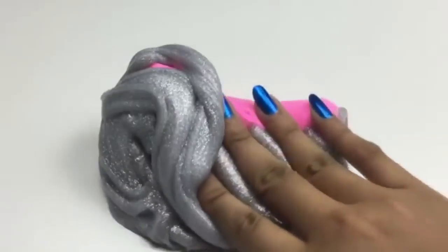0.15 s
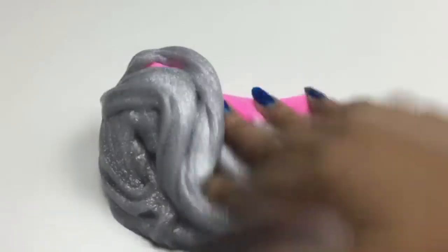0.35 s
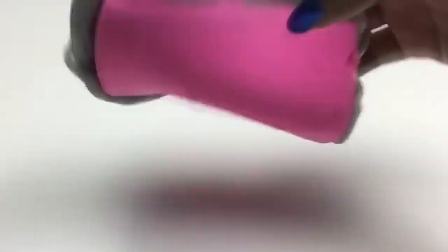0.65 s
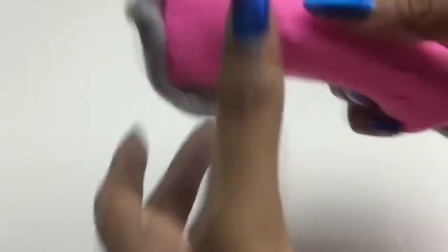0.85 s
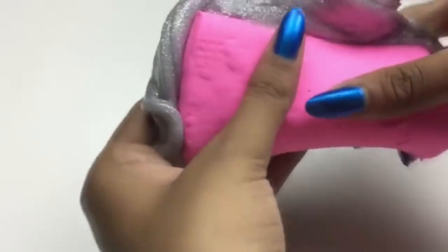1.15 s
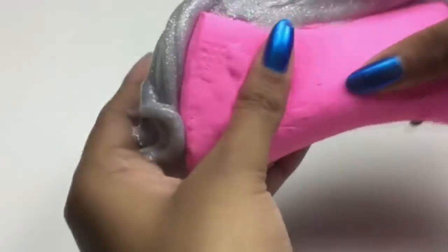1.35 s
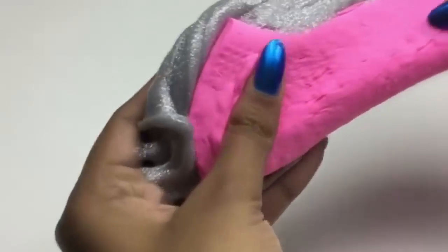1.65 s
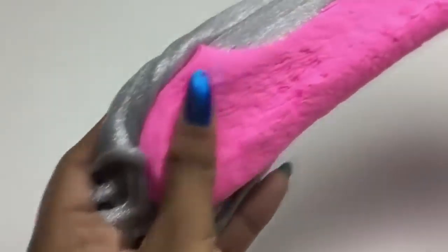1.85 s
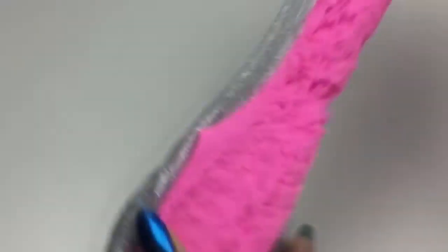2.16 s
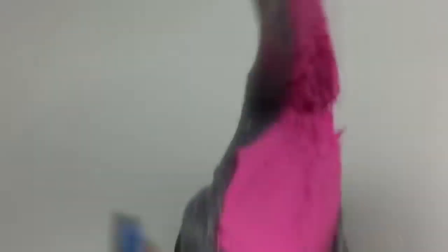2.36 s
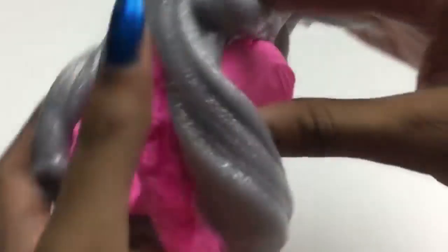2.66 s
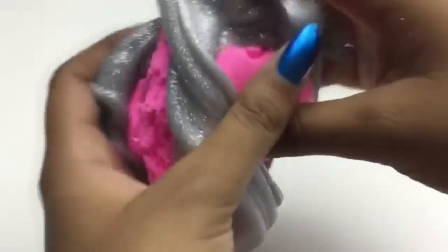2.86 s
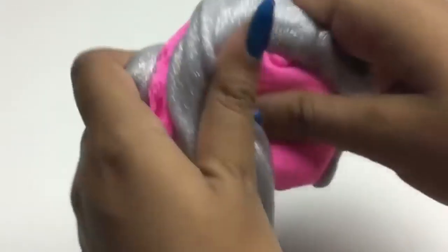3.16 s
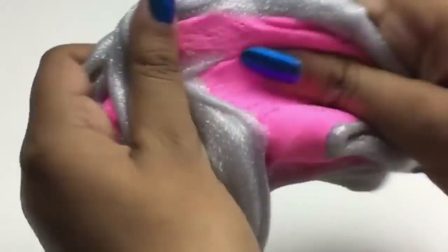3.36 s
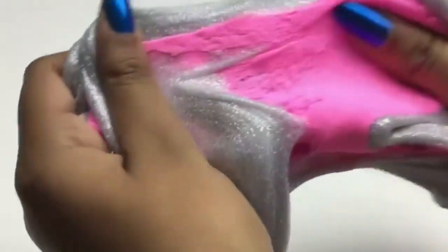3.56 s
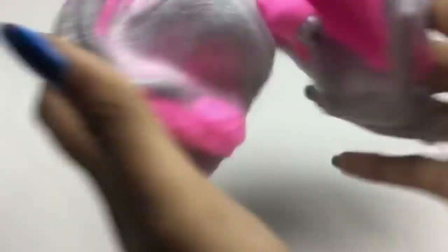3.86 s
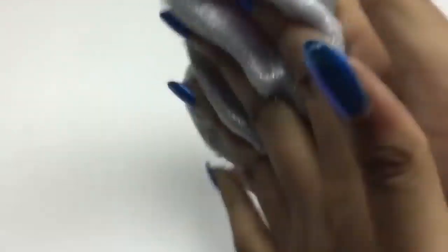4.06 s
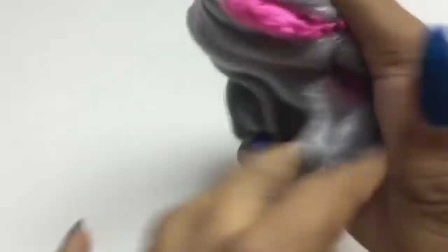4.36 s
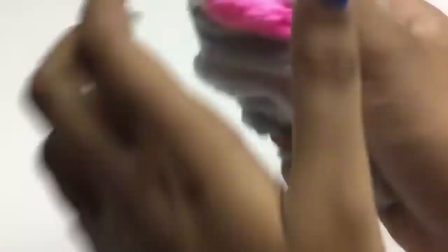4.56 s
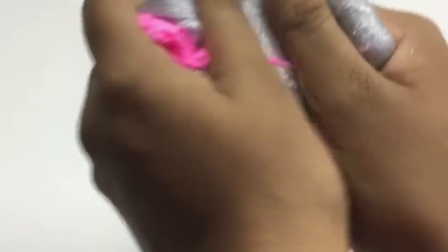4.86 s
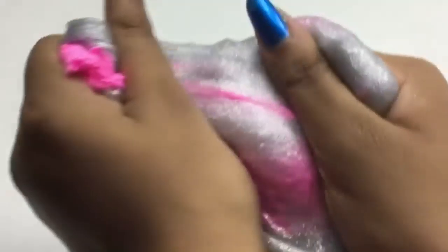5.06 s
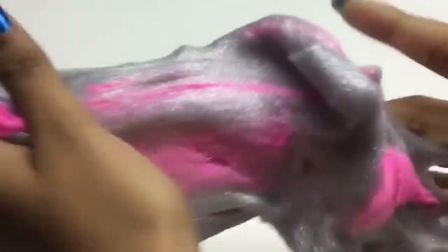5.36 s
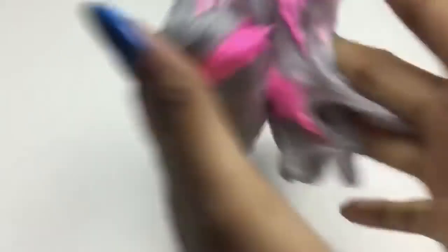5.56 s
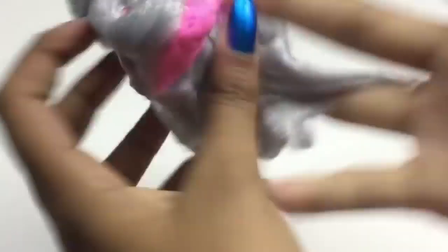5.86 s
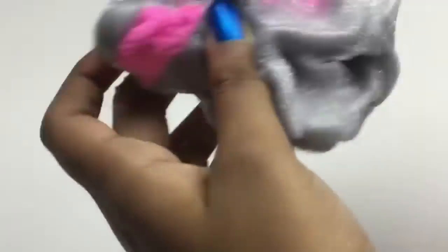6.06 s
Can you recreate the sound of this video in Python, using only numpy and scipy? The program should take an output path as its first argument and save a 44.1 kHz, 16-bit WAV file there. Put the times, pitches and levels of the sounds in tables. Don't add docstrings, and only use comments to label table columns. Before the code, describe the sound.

Sticky film peels off skin in fine wet crackles, mostly sparse at first apart from one early squeeze. Around the middle, a cluster of snaps leads to heavier squelches and short airy wheezes. The last stretch is busiest, with a bright burst, thick kneading and one very sharp crack before easing. Close, dry sound in a small room with distant low hum.

```python
import sys
import numpy as np
from scipy import signal
from scipy.fft import rfft, irfft, next_fast_len
from scipy.io import wavfile
from scipy.ndimage import uniform_filter1d, map_coordinates

SR = 44100
rng = np.random.default_rng(int(sys.argv[2]) if len(sys.argv) > 2 else 0)


def magnitude_from_level(level_db):
    exponent = np.asarray(level_db, float) / 20
    return 10 ** exponent


def unload_wav(signal):
    wavfile.write(
        sys.argv[1],
        SR,
        np.round(np.clip(np.atleast_2d(signal).T, -1, 1) * 32767).astype(np.int16),
    )


N = 274302
SLOPE_DB = 20


def unit(x):
    return x / np.sqrt(np.mean(x ** 2) + 1e-20)


def along(points, hz):
    f, v = np.transpose(points)
    return np.interp(np.log(hz + 1), np.log(f + 1), v)


def curves(rows):
    s, *cols = np.transpose(rows)
    return [np.interp(np.arange(N) / SR, s, c) for c in cols]


def wobble(rate):
    knots = rng.standard_normal(int(N * 200 / SR) + 4)
    return map_coordinates(knots, [np.arange(N) * min(rate, 200) / SR])


def filtered(x, response):
    m = next_fast_len(N + SR // 2)
    spectrum = rfft(x, m) * response(np.fft.rfftfreq(m, 1 / SR))
    return irfft(spectrum, m)[..., :N]


def bursts(peak_s, hz, cycles, gain, size):
    turns = hz[:, None] * np.arange(size) / SR
    swell = turns / cycles * np.exp(1 - turns / cycles)
    rings = gain[:, None] * np.sin(2 * np.pi * turns) * swell
    rings = rings * np.hanning(2 * size)[size:]
    start_s = np.maximum(peak_s[:, None] - cycles / hz[:, None], 0)
    at = np.round(start_s * SR).astype(int) + np.arange(size)
    return np.bincount(at.ravel(), rings.ravel(), N + SR)[:N]


def tearing():
    big_gain, middle_gain, fine_gain = squeeze()
    clumps = magnitude_from_level(1.1 * wobble(45) + 1.5 * wobble(140))
    big = swarm(286, 1290, cycles=1.07, spread_db=2.5, wash=0.42, clumps=clumps, count=3000, size=500)
    middle = swarm(1160, 3910, cycles=1.4, spread_db=2.0, wash=0.7, clumps=clumps, count=8000, size=200)
    fine = swarm(4000, 15000, cycles=1.1, spread_db=3.2, wash=0.5, clumps=clumps, count=20000, size=80)
    return magnitude_from_level(-1.86) * big_gain * big + magnitude_from_level(-0.42) * middle_gain * middle + magnitude_from_level(-2.0) * fine_gain * fine


def squeeze():
    # start_s, pull_db, film_thinness_db
    pull = [(0, -73.5, -8), (.445, -77.5, -4), (.64, -68.5, -5), (.786, -73, -5), (.87, -69, 1),
            (1.1, -65, -7), (1.36, -67.5, 0), (1.5, -76, -2.5), (2.1, -74.5, 4.5), (2.5, -73, 5.5),
            (3.02, -73, 1), (3.49, -68, 9.5), (3.505, -58.5, 3), (3.83, -58.5, 1), (4.17, -64, -3.5),
            (4.6, -70, -1.5), (5.3, -60.5, 2), (5.77, -60.5, -2)]
    # peak_s, rise_s, fall_s, level_db, big_pockets_over_rest_db
    knead_strokes = [(0.536, 0.033, .075, -41.5, -1), (.58, 0.017, 0.056, -50.5, 0.5),
                     (1.227, 0.082, 0.049, -59.5, 1.5), (1.322, 0.04, 0.008, -59, -14),
                     (2.235, 0.072, 0.16, -65.5, -1.5), (2.427, 0.043, 0.028, -55.5, -3.5),
                     (2.801, 0.045, 0.079, -53.5, -9), (3.397, 0.1, 0.084, -52, -4.5),
                     (3.53, 0.034, 0.23, -67, 7), (3.949, 0.062, 0.09, -39, -7.5),
                     (4.085, 0.26, 0.059, -52.5, -7.5), (4.426, 0.094, 0.06, -44, -6.5),
                     (4.483, 0.037, 0.037, -44, -1), (5.386, 0.051, 0.1, -38, -5),
                     (5.465, 0.075, 0.07, -46, -2), (5.524, 0.014, 0.086, -42, -14),
                     (5.582, 0.063, 0.04, -44, -1), (5.652, .012, 0.057, -50, -6),
                     (5.685, 0.064, 0.047, -45, -5), (5.72, 0.029, 0.02, -48.5, -3),
                     (6.016, 0.064, 0.082, -50.5, -2.5), (6.068, 0.042, 0.052, -49.5, -12),
                     (6.16, 0.031, 0.033, -48.5, -11), (6.184, .021, 0.065, -58, 7.5)]
    # peak_s, rise_s, fall_s, level_db, middle_pockets_over_film_db
    peel_strokes = [(.705, .011, .04, -60.5, -3.5), (.99, 0.18, .25, -63.5, 1.5),
                    (1.255, .011, .04, -55, -3), (1.29, .06, .11, -64, -11), (2.71, 0.11, .15, -59, -2),
                    (2.2, .011, .3, -67.5, -8), (3.319, 0.002, 0.024, -39.5, -5),
                    (3.88, 0.077, 0.19, -47, -6), (3.939, .007, 0.046, -36.5, -3.5),
                    (4.135, 0.14, 0.02, -56.5, -3), (4.28, 0.19, 0.13, -58.5, -10),
                    (4.322, .006, 0.14, -52, -10), (4.345, 0.063, 0.16, -45, -4.5),
                    (4.538, 0.1, 0.016, -50, -2), (5.0, 0.077, 0.082, -48.5, -8.5),
                    (5.116, 0.002, 0.02, -35, -11), (5.14, 0.033, 0.087, -55, -21),
                    (5.255, .009, 0.054, -47.5, 0), (5.356, 0.047, 0.12, -39.5, -9),
                    (5.62, .11, .11, -53, -0.5), (5.811, .008, .15, -58, 0.5),
                    (5.919, 0.091, 0.26, -53.5, -1.5), (5.065, .006, .04, -56, -12)]
    pull_db, thin_db = curves(pull)
    knead_db, big_db = np.transpose(knead_strokes)[3:]
    peel_db, middle_db = np.transpose(peel_strokes)[3:]
    big_rest_db = -63.5 + 0.68 * (pull_db + 60.5)
    film_db, peel_big_db = 0.6, -10.5
    steady = [big_rest_db, pull_db, pull_db + thin_db]
    kneads = [knead_db + big_db, knead_db, knead_db + film_db]
    peels = [peel_db + middle_db + peel_big_db, peel_db + middle_db, peel_db]
    gains = []
    for rest, knead, peel in zip(steady, kneads, peels):
        power = strokes(knead_strokes, knead, roundness=1.63) + strokes(peel_strokes, peel, roundness=1.03)
        gains.append(np.sqrt(magnitude_from_level(rest) ** 2 + power))
    return gains


def strokes(rows, level_db, roundness):
    s, rise_s, fall_s = np.transpose(rows)[:3, :, None]
    t = np.arange(0, N, 32) / SR
    away = np.where(t < s, (s - t) / rise_s, (t - s) / fall_s)
    power = magnitude_from_level(level_db[:, None] - SLOPE_DB * away ** roundness) ** 2
    return np.interp(np.arange(N) / SR, t, power.sum(0))


def swarm(lo_hz, hi_hz, cycles, spread_db, wash, clumps, count, size):
    # frequency_hz, density_db_per_hz
    tear_colour = [(120, -47), (200, 1.5), (322, -2.5), (466, -7.5), (819, -6.0), (1070, -9.0),
                   (2010, -8.5), (2910, -10.5), (6440, -2.5), (13500, -6.5), (17000, -8)]

    def band(f):
        edges = np.sqrt((1 + (lo_hz / (f + 1)) ** 8) * (1 + (f / hi_hz) ** 8))
        return magnitude_from_level(along(tear_colour, f)) / edges

    when, pitch, chance, sign = rng.random((count, 4)).T
    gain = magnitude_from_level(-spread_db * np.log(chance + 8e-3)) * np.sign(sign - 0.5)
    grains = unit(bursts(when * N / SR, lo_hz * (hi_hz / lo_hz) ** pitch, cycles, gain, size))
    coloured = unit(filtered(grains, lambda f: band(f) * np.sqrt(f / hi_hz)))
    finer = unit(filtered(rng.standard_normal(N), band))
    wash = np.clip(wash, 0, 1)
    return unit((np.sqrt(1 - wash) * coloured + np.sqrt(wash) * finer) * clumps)


def hollow(x):
    # start_s, centre_hz, lift_db
    hollow_path = [(.5, 310, 0), (.58, 330, 7), (.63, 1800, 1), (1.2, 1420, 0.5), (2.23, 2220, 4),
                   (2.43, 1270, 4), (2.8, 1410, 1.5), (3.52, 352, 7), (3.8, 420, 3.5), (3.9, 2750, -1.5),
                   (4.02, 2000, 5), (4.13, 1440, 4), (4.45, 2280, 1), (5.3, 2210, -3), (5.37, 800, 4.5),
                   (5.48, 825, 1.5), (5.53, 3460, -0.5), (5.72, 1600, -2)]
    hz, t, z = signal.stft(x, SR, nperseg=512)
    s, centre_hz, lift_db = np.transpose(hollow_path)
    octaves = np.log2((hz[:, None] + 1) / np.interp(t, s, centre_hz))
    lift = np.interp(t, s, lift_db) * (np.exp(-(octaves / 0.4) ** 2) - 0.25)
    patches = uniform_filter1d(rng.standard_normal(z.shape), size=7, axis=0)
    patches = uniform_filter1d(patches, size=6, axis=1)
    return signal.istft(z * magnitude_from_level(lift + 1.53 * unit(patches)), SR, nperseg=512)[1][:N]


def pops():
    # peak_s, snap_db, snap_hz, cavity_db, cavity_hz
    large_pops = np.array([(0.5254, -29, 5530, -29, 2310), (0.5343, -22, 7000, -35, 587),
                           (0.987, -33, 8450, -46, 1850), (1.227, -36, 3020, -29.5, 1460),
                           (2.2366, -35.5, 8300, -39, 1710), (2.4236, -31, 7570, -37.5, 1670),
                           (2.7317, -37, 8460, -42, 2110), (3.0164, -33, 8200, -36, 1940),
                           (3.0542, -27.5, 5840, -38, 2270), (3.3185, -24, 5940, -35.5, 1190),
                           (3.394, -27, 4320, -38.5, 1220), (3.501, -23, 5830, -26.5, 2490),
                           (3.9384, -18, 5700, -27, 3000), (3.9627, -30, 5490, -27, 2170),
                           (4.44, -32, 3070, -40, 2370), (5.0035, -28.5, 3850, -31, 1980),
                           (5.1154, -26, 5370, -27, 740), (5.2531, -23.5, 2870, -17, 1880),
                           (5.3535, -21, 5800, -40, 1940), (5.5208, -24.5, 4580, -35.5, 970),
                           (5.8051, -24, 8500, -30, 2200), (5.9133, -37, 7550, -36, 2190),
                           (6.0638, -40, 5700, -35, 2520), (6.1552, -30, 5700, -42, 850)])
    # peak_s, level_db, pitch_hz
    ticks = [(.8352, -48, 8600), (0.846, -51, 3410), (1.7298, -42, 6180), (1.9311, -46, 6830),
             (2.003, -40.5, 8750), (2.0953, -49, 6140), (2.9964, -50, 3620), (3.1818, -45, 7000),
             (3.1987, -45, 8420), (3.3635, -30, 8760), (3.371, -36, 9100), (3.4059, -36, 3470),
             (3.4188, -39, 3730), (3.523, -40, 4720), (3.6354, -35, 6160), (3.6447, -42.7, 5860),
             (2.733, -43, 3300), (4.2353, -41, 8940), (4.8465, -42, 4600), (4.9679, -42, 6880),
             (5.0298, -32, 8090), (5.0451, -42, 4120), (5.0726, -39, 5500), (5.0906, -39, 7000),
             (5.2211, -43, 6570), (5.509, -32, 6000), (5.577, -25, 3380), (6.2114, -38, 3540)]
    # peak_s, level_db
    cracks = [(.5342, -30), (.9873, -38), (1.6578, -47), (1.7295, -33), (1.9311, -44), (2.0953, -49),
              (2.1995, -41), (2.2366, -37), (2.4235, -28), (2.803, -38), (3.0166, -41), (3.0541, -26),
              (3.3635, -32), (3.394, -30), (3.4188, -36), (3.4278, -30), (3.501, -22), (3.6354, -31),
              (3.9383, -32), (4.4399, -24), (4.5356, -34), (4.6829, -30.5), (4.847, -29.5), (5.1155, -39),
              (5.353, -25), (5.5771, -34), (5.8053, -10), (5.914, -33), (6.1554, -43), (6.2114, -30)]
    # peak_s, level_db, pitch_hz
    further_ticks = [
        (5.6495, -36, 5000),
        (4.9972, -40, 5500),
        (5.6905, -36, 5500),
    ]
    # peak_s, level_db, pitch_hz
    knocks = [(1.187, -36, 1500), (1.1885, -39.5, 700), (1.2128, -36.5, 1950), (1.324, -38.5, 2410),
              (1.8855, -46, 2190), (2.0097, -42.5, 2120), (3.1997, -48.5, 1340), (3.2761, -50, 1700),
              (3.4515, -42, 1900), (3.523, -42, 1730), (3.6033, -49, 2230), (4.5472, -48, 1900),
              (5.097, -42, 650), (6.1858, -29.5, 780)]
    # peak_s, pitch_hz, level_db
    further_tones = [(1.2272, 2400, -38.5), (3.0159, 4400, -47), (3.0166, 3300, -40), (3.4, 5000, -49),
                     (5.1155, 7400, -12.5), (5.1155, 9100, -15.5), (5.1155, 11800, -32), (5.1164, 1180, -33.5),
                     (5.1156, 2450, -40), (5.8056, 3100, -34), (5.8057, 1950, -28), (5.8053, 15000, -25),
                     (5.1194, 3600, -29), (5.1156, 4180, -15), (5.1155, 5150, -10.5), (5.2533, 6700, -31),
                     (5.2533, 13000, -44), (5.8053, 7500, -18), (5.8053, 9300, -25), (.948, 12500, -52),
                     (1.188, 8500, -51)]

    crack_s, crack_db = np.transpose(cracks)
    crack_snaps = np.column_stack([crack_s, crack_db, np.full(len(crack_s), 0.0)])[:0]
    s, snap_db, snap_hz = np.vstack([large_pops[:, :3], ticks, crack_snaps, further_ticks]).T
    snap = bursts(s, snap_hz, 0.75, magnitude_from_level(snap_db), size=200)
    other_hz = np.where(snap_hz < 6500, 1.55, 1.3) * snap_hz
    second = bursts(s, other_hz, 1.2, magnitude_from_level(snap_db - 2.5), size=200)

    s, cavity_db, cavity_hz = np.vstack([large_pops[:, [0, 3, 4]], knocks]).T
    cavity = bursts(s + 0.0002, cavity_hz, 0.62, magnitude_from_level(cavity_db - 2.5), size=500)
    crack = bursts(crack_s, np.full(len(crack_s), 12300.0), 1.6, magnitude_from_level(crack_db - 6.5), size=100)
    s, twin_hz, twin_db = np.transpose(further_tones)
    twin = bursts(s, twin_hz, 1.545, magnitude_from_level(twin_db), size=200)
    return snap + second + cavity + crack + twin


def bubbles():
    # peak_s, pitch_hz, peak_db
    closed_pockets = [(.537, 330, -35), (.538, 1080, -37), (.551, 550, -39), (0.6168, 1850, -33.5),
                      (2.2293, 2350, -47), (2.733, 2050, -47.5), (2.801, 1540, -45), (2.802, 3960, -44),
                      (3.763, 2240, -45), (4.329, 2500, -44), (3.944, 5700, -33), (4.132, 1420, -45.5),
                      (4.39, 1900, -40), (4.419, 800, -39.5), (4.438, 2210, -39), (5.355, 5370, -36),
                      (5.355, 1980, -36.5), (5.377, 3170, -36), (5.387, 760, -37), (5.391, 2690, -38),
                      (5.403, 4300, -38), (5.428, 840, -36), (5.433, 2040, -33.5), (5.477, 840, -36),
                      (5.529, 3100, -39), (5.575, 3240, -36), (5.676, 3620, -39), (5.711, 1460, -46),
                      (6.027, 3640, -43), (6.065, 2500, -40), (6.066, 840, -41.5), (6.156, 5800, -34),
                      (6.128, 2250, -48), (5.591, 360, -38), (2.524, 3700, -53), (2.732, 2750, -47),
                      (4.428, 700, -42), (4.793, 2400, -51), (4.803, 2250, -51), (5.032, 800, -47)]
    s, hz, db = np.transpose(closed_pockets)
    return bursts(s, hz, 0.072 * np.sqrt(hz[:, None]), magnitude_from_level(db - 1.5), size=800)


def splutters():
    # peak_s, rise_s, fall_s, level_db, centre_hz
    emptying = [(3.0162, .006, 0.0065, -48, 5000), (3.0545, 0.0018, 0.0036, -46, 7000),
                (3.3235, .006, .012, -44, 6000), (3.3642, .001, .003, -45, 9500),
                (3.3685, .002, .002, -45, 11000), (3.371, .002, .003, -43, 10500),
                (3.386, .001, .003, -46, 9000), (3.397, .003, .004, -42, 4500),
                (3.406, .002, .003, -46, 5000), (3.4195, .004, 0.0083, -44.5, 8000),
                (5.1105, .001, .001, -47, 10000), (5.1133, .001, .002, -41, 9000),
                (5.12, .004, 0.032, -35.5, 6230), (5.2735, .0015, .0015, -45, 12000),
                (1.257, .006, .006, -52, 7500), (1.321, .012, .004, -54, 4500),
                (1.336, .002, .003, -56, 9500), (3.885, .012, .01, -41, 5460),
                (4.017, .002, .005, -47, 6000), (4.321, .002, .04, -45, 5000),
                (4.416, .004, .006, -45, 7000), (4.481, .008, .012, -42, 6500),
                (4.498, .006, .004, -49, 5500), (4.535, .004, .004, -47, 7000),
                (5.521, .003, 0.0042, -42, 5500), (5.53, .004, .005, -42, 4000),
                (5.553, .002, .002, -36, 7000), (5.592, .004, .004, -42, 8500),
                (6.064, .008, 0.012, -43, 5000), (6.163, .008, .014, -44, 5800),
                (5.913, .004, .003, -49, 3000), (6.2115, .002, .003, -46, 6000),
                (5.003, 0.0028, 0.0035, -46, 3000), (4.848, .003, .008, -53, 5000),
                (5.145, .03, 0.072, -47, 6200), (.545, .012, .03, -44, 5500), (5.39, .01, .02, -43, 8000),
                (5.428, .008, .01, -44, 9000), (4.983, .02, 0.017, -51.5, 3500),
                (5.0645, .002, .003, -52, 9000)]
    return escapes(emptying, octaves=0.91, size=4096)


def wheezes():
    # peak_s, rise_s, fall_s, level_db, centre_hz
    folds = [(.542, .015, .05, -41, 330), (.55, 0.017, 0.011, -46, 540), (6.064, .006, .015, -47, 2400),
             (1.196, .006, .012, -55, 2200), (3.6, .1, 0.22, -64, 400), (3.68, .05, .1, -60.5, 4270),
             (3.865, .01, 0.033, -50, 3400), (3.905, .01, .012, -52, 2000), (4.005, .015, .01, -46, 2000),
             (4.022, .012, .02, -48, 2100), (4.06, .01, .05, -53, 1600), (4.07, .02, .03, -54, 5700),
             (4.388, 0.011, .06, -46, 2050), (4.436, .02, .008, -46, 2800), (4.488, .012, .012, -46.5, 900),
             (5.258, .004, .007, -41, 5800), (5.267, .004, .008, -49, 1000), (5.424, 0.012, .016, -44, 800),
             (5.478, 0.02, .004, -43, 850), (5.572, 0.035, .014, -39.5, 3400),
             (5.594, .005, 0.006, -45, 650), (5.97, .04, .03, -53.5, 2080), (6.025, .03, .006, -51, 3600),
             (6.165, 0.025, 0.012, -49, 1950), (6.188, .004, .008, -46, 1300), (5.39, .02, .02, -42, 2600),
             (5.808, .002, .006, -55, 7500), (.605, .01, .015, -54, 397), (.984, 0.0056, .006, -51, 1610),
             (1.168, .008, .015, -57, 1910), (2.427, .03, .03, -59, 1300), (2.797, .04, .03, -53.5, 1490),
             (3.398, 0.011, .015, -49.5, 700), (3.953, .01, .02, -43, 2900), (3.976, .008, .01, -45, 900),
             (4.443, 0.008, .01, -48, 900), (5.355, .005, .01, -46.5, 600), (5.405, .01, .012, -44, 1500),
             (5.61, 0.011, .015, -53, 380), (5.677, 0.006, .02, -46, 1300)]
    return escapes(folds, octaves=0.24, size=16384)


def escapes(rows, octaves, size):
    s, rise_s, fall_s, db, hz = np.transpose(rows)[:, :, None]
    noise = rng.standard_normal((len(rows), 2, size))
    rough = noise[:, 0] * magnitude_from_level(3 * noise[:, 1])
    away_octaves = np.log2((np.fft.rfftfreq(size, 1 / SR) + 1) / hz)
    jets = irfft(rfft(rough) * np.exp(-(away_octaves / octaves) ** 2), size)
    t = (np.arange(size) - size // 2) / SR
    away = np.where(t < 0, -t / rise_s, t / fall_s)
    jets = jets / jets.std(1, keepdims=True) * magnitude_from_level(db - SLOPE_DB * away ** 1.16)
    at = np.round(s * SR).astype(int) + np.arange(size)
    return np.bincount(at.ravel(), jets.ravel(), N + 2 * size)[size // 2:][:N]


def room(x):
    # frequency_hz, t60_s
    walls = [(200, 0.049), (2000, 0.1), (6000, 0.036), (14000, 0.019)]
    hz, t, z = signal.stft(rng.standard_normal(SR // 3), SR, nperseg=256)
    decay = magnitude_from_level(-60 * t / along(walls, hz)[:, None])
    tail = signal.istft(z * decay, SR, nperseg=256)[1]
    return signal.fftconvolve(np.pad(x, (50, 0)), tail / np.linalg.norm(tail))[:N]


def fan():
    # centre_hz, width_hz, level_db
    resonances = [
        (59.47, 13.5, -63),
        (125.6, 18, -66.5),
        (244.3, 17, -74),
    ]
    # start_s, hum_db, blade_db
    swell = [(0.0, -56, -68), (0.6, -65, -61.5), (0.66, -62.5, -71), (1.7, -55, -60), (1.75, -47.5, -61.5),
             (1.97, -61, -61), (2.46, -54.5, -57), (2.61, -61.5, -62.5), (3.2, -52, -70),
             (3.38, -51, -61.5), (3.45, -58, -75), (3.53, -49, -58), (3.64, -56.5, -68.5),
             (5.3, -53.5, -61.5), (5.4, -69, -58), (5.51, -52, -65.5), (6.17, -58, -62), (6.22, -55, -71.5)]
    hum_db, blade_db = curves(swell)

    def narrow(hz, width):
        return unit(filtered(rng.standard_normal(N), lambda f: 1 / (1 + (2 * (f - hz) / width) ** 2)))

    def tone(hz, wander):
        return np.sin(2 * np.pi * hz * np.arange(N) / SR + wander)

    air = sum(magnitude_from_level(db) * narrow(hz, width) for hz, width, db in resonances)
    blades = magnitude_from_level(blade_db + 2.5) * tone(137.5, 0.87 * wobble(2.97))
    hum = magnitude_from_level(hum_db + 2.0 + 1.5 * wobble(7)) * tone(59.7, 1.1 * wobble(5))
    return air + blades + hum


def hiss():
    # frequency_hz, density_db_per_hz
    floor_colour = [(12, -45), (20, -20.0), (44, -2.5), (70, -0.5), (142, -10.5), (187, -11), (239, -13.5),
                    (485, -25.5), (604, -26.5), (815, -30), (2850, -33), (3180, -34.0), (17000, -42.0)]
    return magnitude_from_level(-58.5) * unit(filtered(rng.standard_normal(N), lambda f: magnitude_from_level(along(floor_colour, f))))


def scene():
    slime = hollow(tearing()) + pops() + bubbles()
    heard = slime + magnitude_from_level(-16.5) * room(slime) + fan() + hiss()
    return (heard + splutters() + wheezes())[None]


def top_cut(x):
    return signal.sosfilt(signal.butter(12, 16650, fs=SR, output="sos"), x)


def record(dry):
    full_band_s = [
        1.7295,
        3.0541,
        3.501,
        4.6829,
        4.847,
        5.1155,
        5.8052,
    ]
    hz, t, z = signal.stft(dry, SR, nperseg=1024)
    f = hz[:, None]
    edge_hz = 16100 + 1100 * rng.standard_normal(len(t) // 4 + 1).repeat(4)[:len(t)]
    edge_hz = np.clip(edge_hz, 14300, 15800)
    patches = rng.random((len(hz) // 4 + 1, len(t) // 3 + 1)).repeat(4, 0).repeat(3, 1)
    holes = patches[:len(hz), :len(t)] < 0.15
    trace = np.where((f > edge_hz) | holes, magnitude_from_level(-36), magnitude_from_level(-12))
    is_open = np.abs(t[:, None] - full_band_s).min(1) < 0.012
    trace[:, is_open] = magnitude_from_level(-14) * (f < 16500)
    port = magnitude_from_level(-4.5 * np.exp(-((f - 10490) / 320) ** 2))
    kept = signal.istft(z * port * np.where(f < 13950, 1, trace), SR, nperseg=1024)[1][:, :N]
    return top_cut(kept)


dry = scene()
out = record(dry)
unload_wav(out)
```